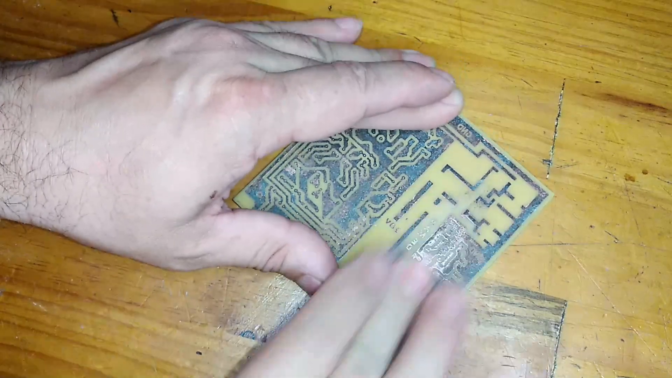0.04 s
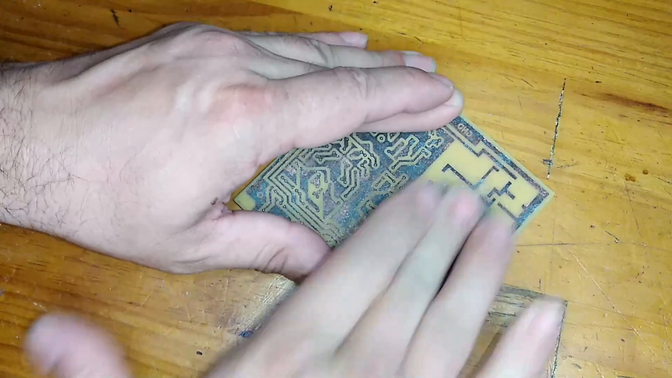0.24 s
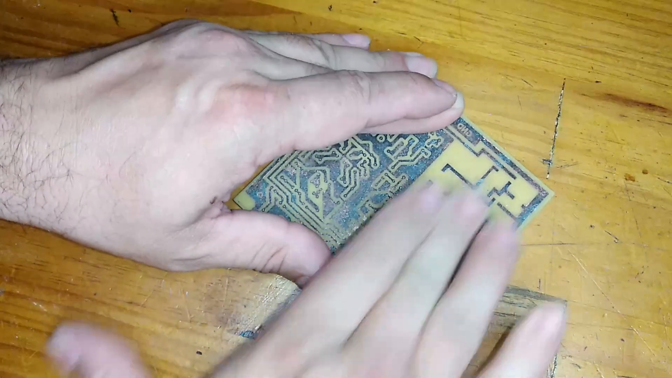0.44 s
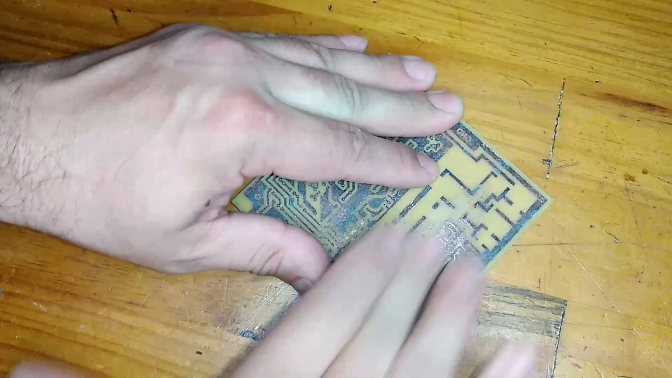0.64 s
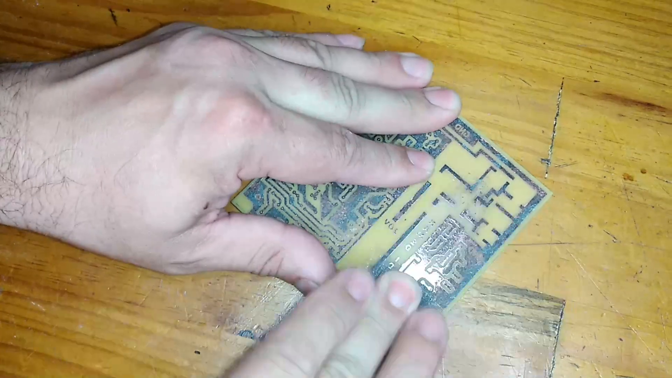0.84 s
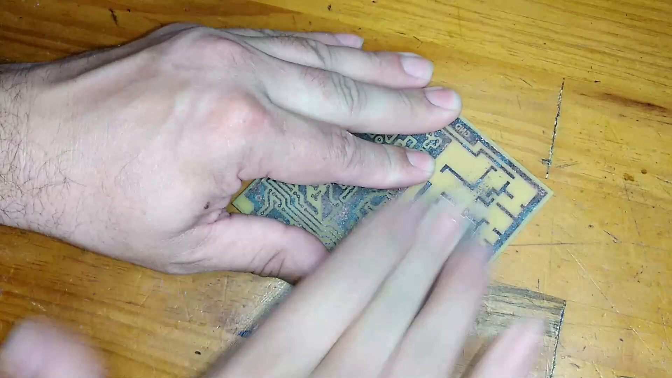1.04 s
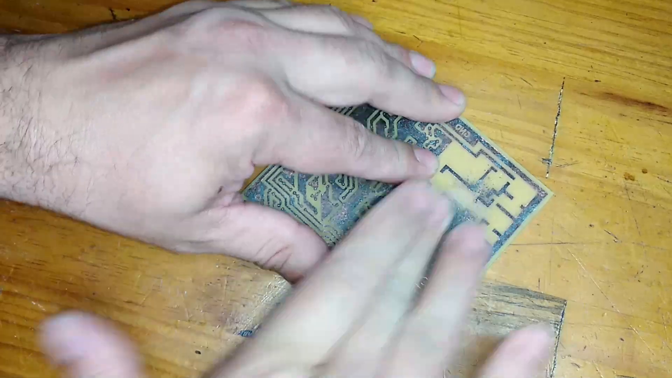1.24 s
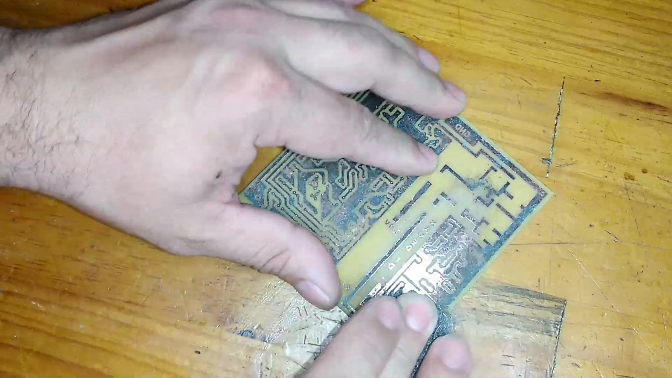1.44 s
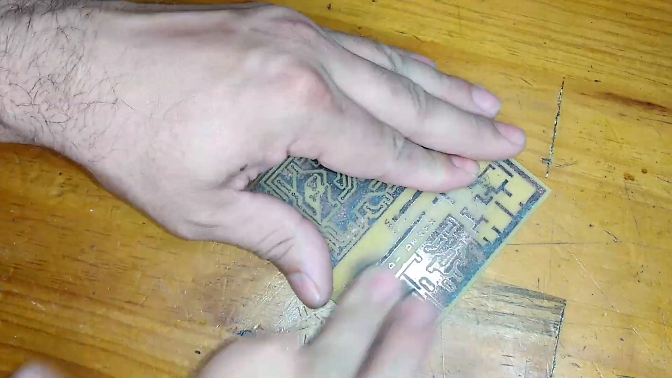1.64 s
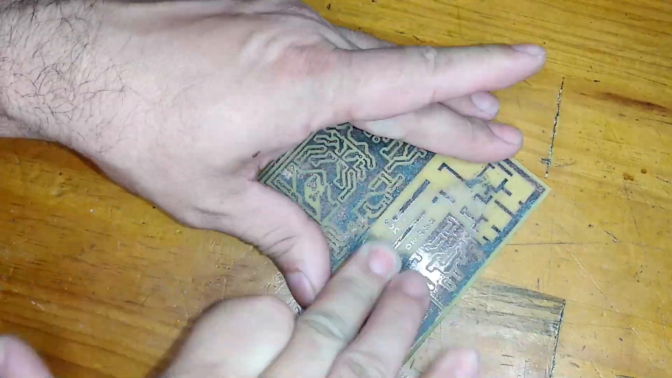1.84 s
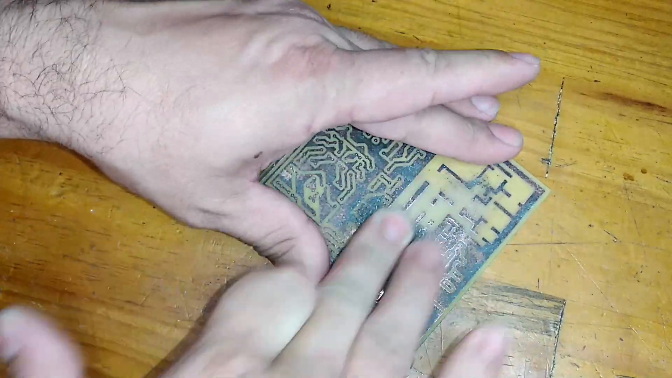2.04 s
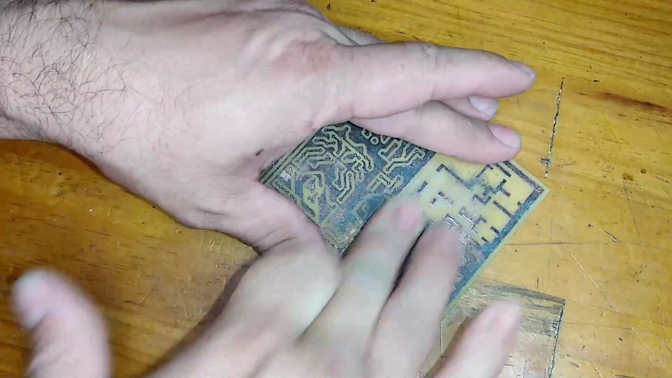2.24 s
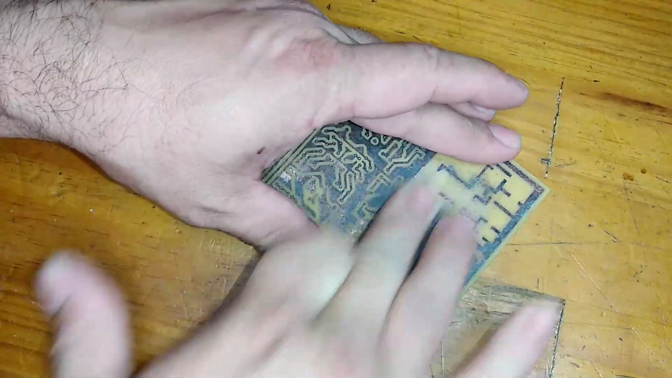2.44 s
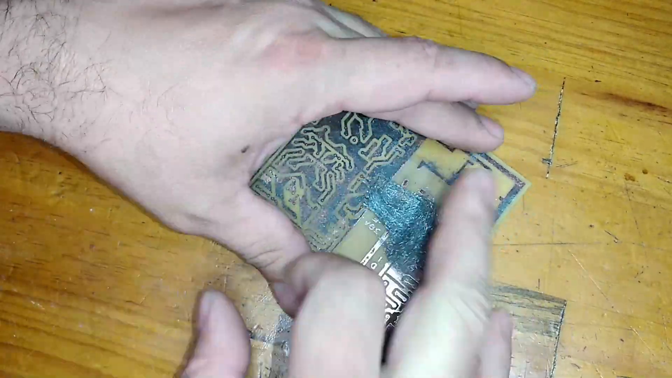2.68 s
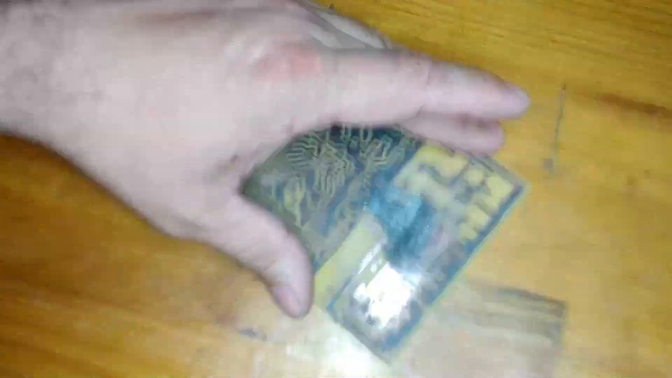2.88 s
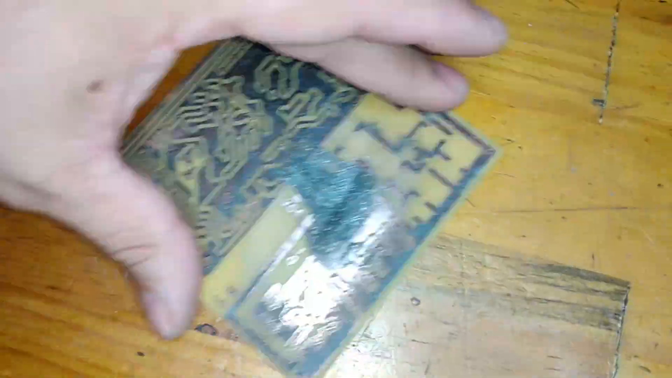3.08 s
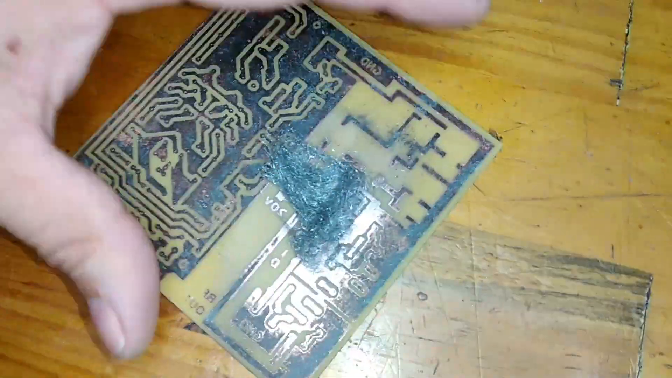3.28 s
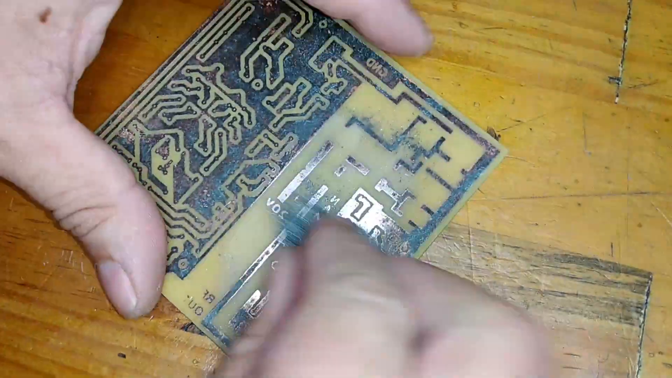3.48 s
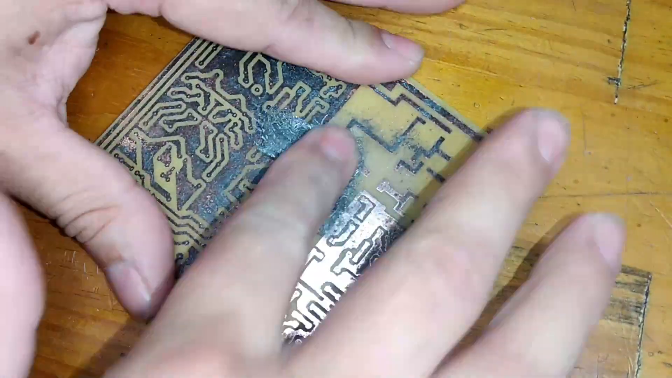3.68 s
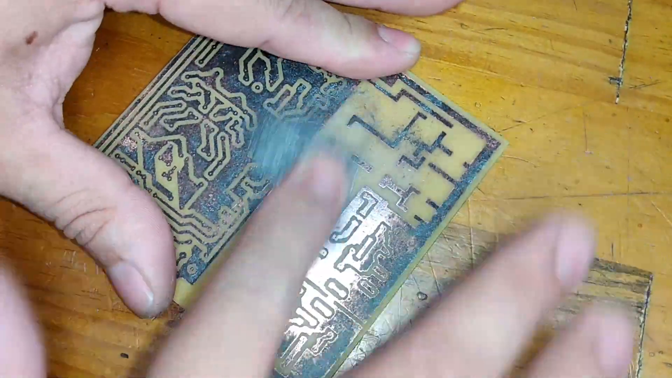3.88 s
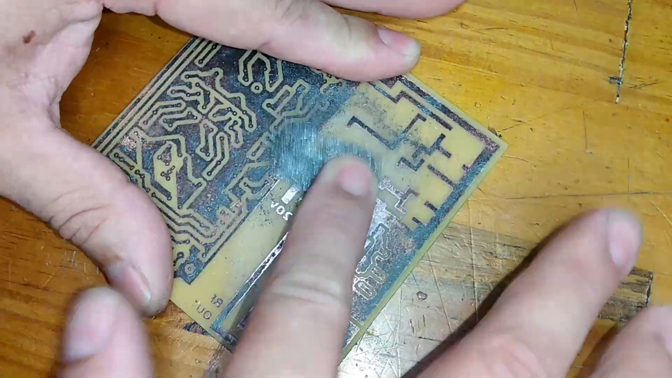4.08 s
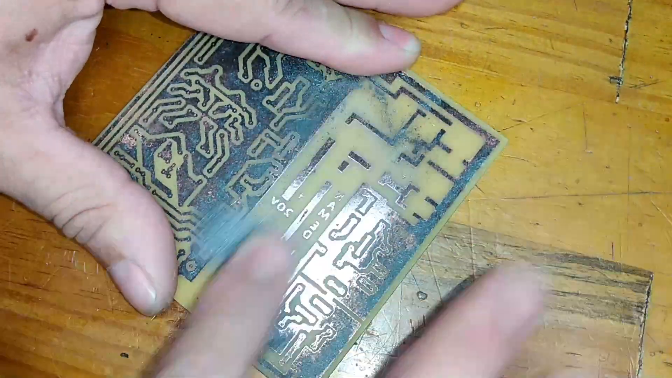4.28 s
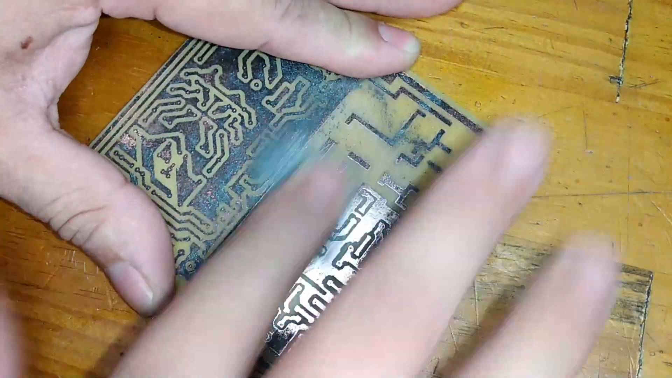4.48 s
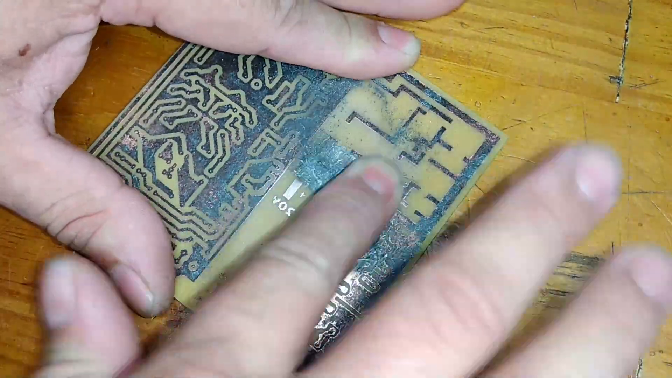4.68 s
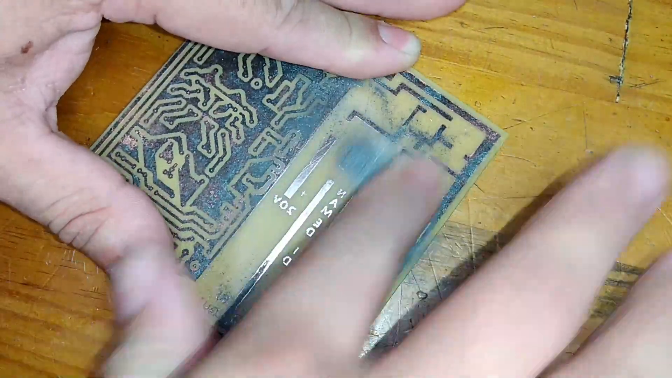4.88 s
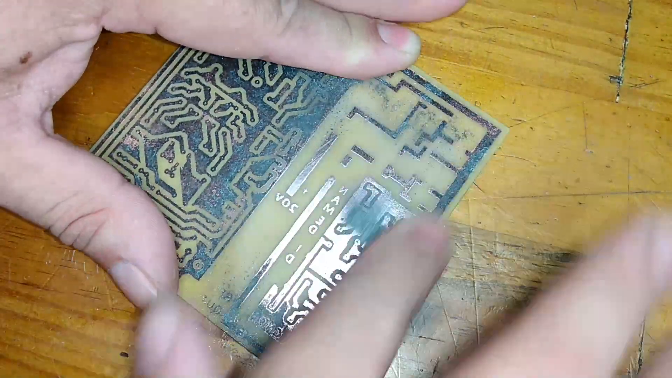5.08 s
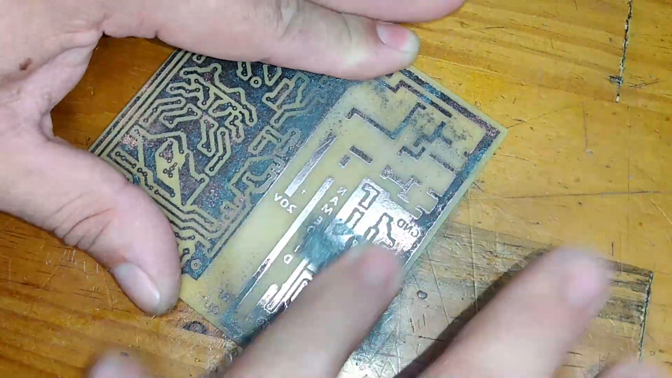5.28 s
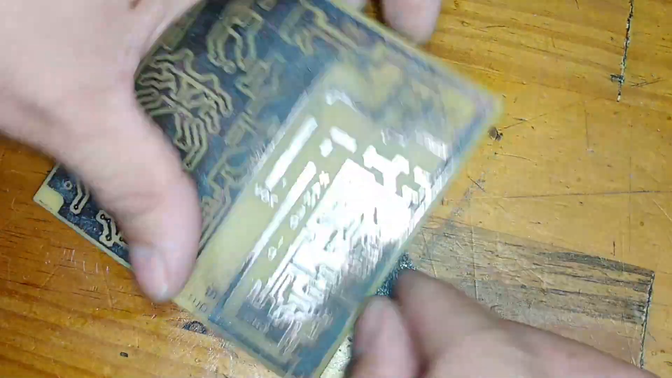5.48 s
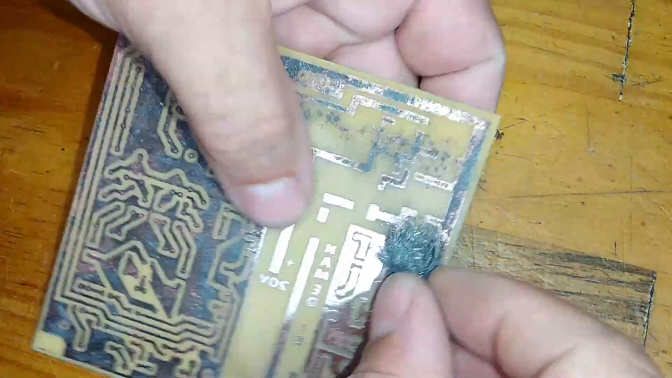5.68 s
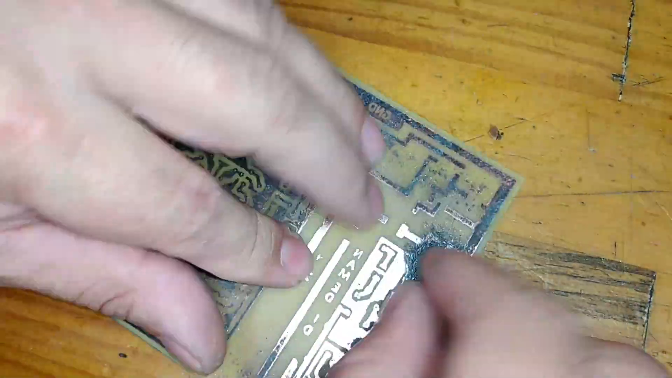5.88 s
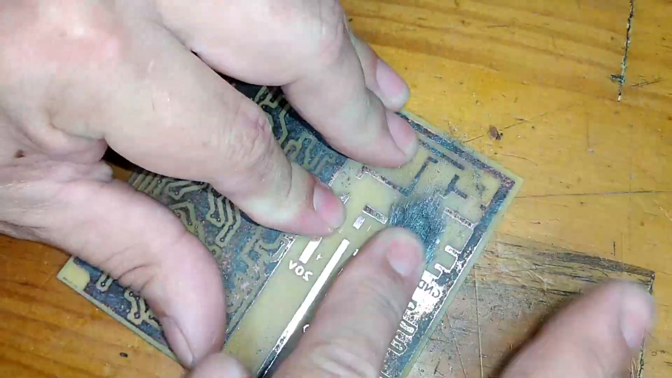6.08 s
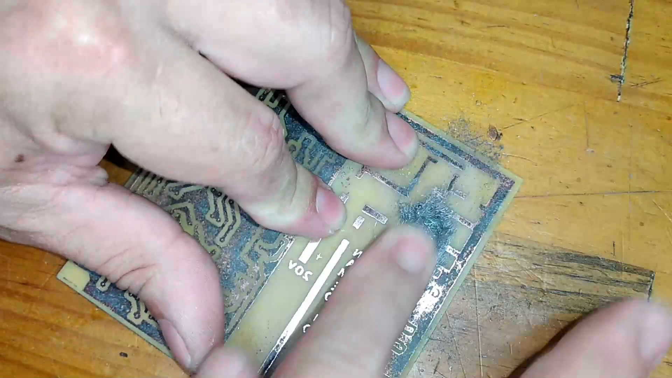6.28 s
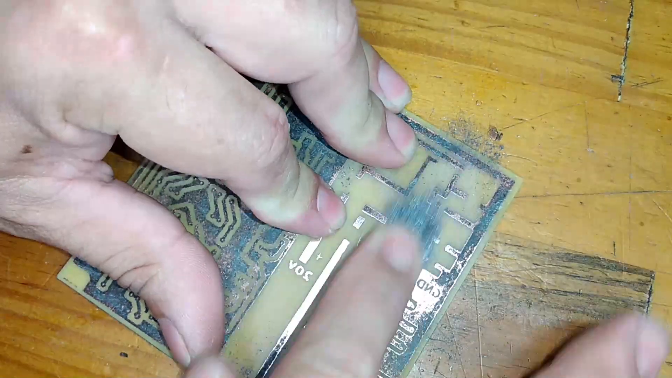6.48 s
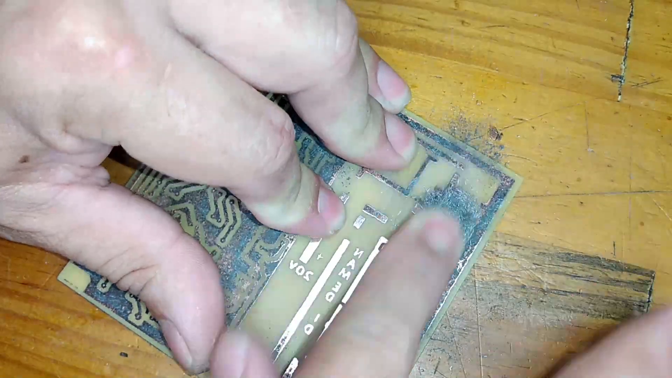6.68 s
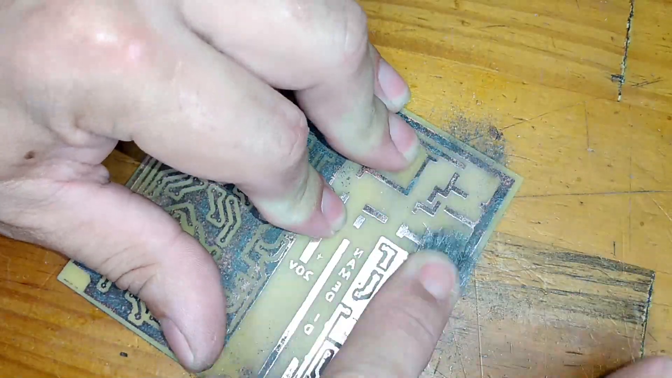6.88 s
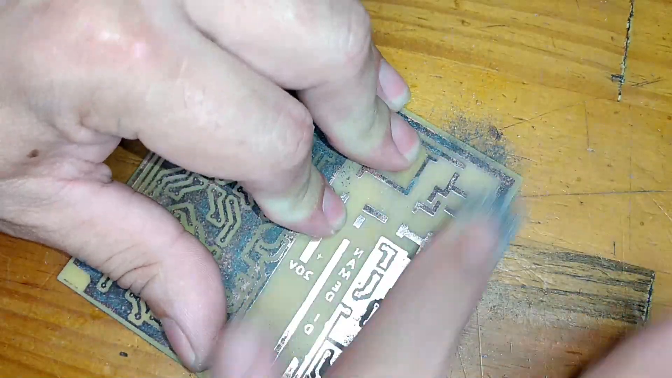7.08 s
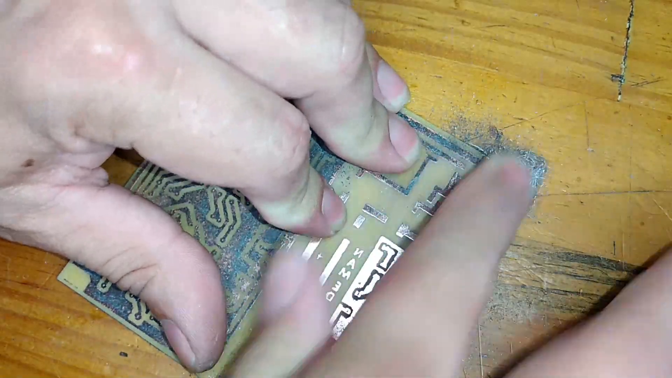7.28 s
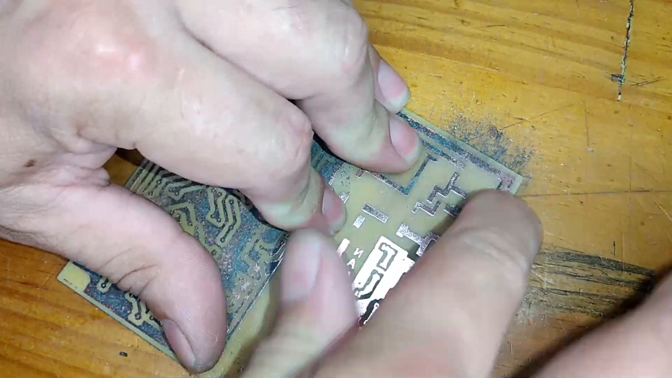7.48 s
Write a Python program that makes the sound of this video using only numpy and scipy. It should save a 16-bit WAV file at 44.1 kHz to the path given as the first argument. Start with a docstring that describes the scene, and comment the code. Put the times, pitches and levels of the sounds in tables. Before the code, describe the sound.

Hissing, raspy wire-wool strokes start slow and turn rapid, growing squeaky and hollow, broken by quiet handling ticks and one hard board clack.

```python
"""On a wooden workbench, close to the listener, a wad of steel wool is scrubbed to and fro over a circuit board.
Sliding friction is noise with random snags, swelling with each stroke's speed: it makes the wires hiss,
the board rasp and the bench rumble. Stick-slip adds squeaks and growls, and the pulls whine and sing.
Between the bouts, regripping and handling give light rubs, ticks, a slide and a clack. Small taps come with
the handling and a few strokes; thuds, a faint ringing wire, a short room tail and quiet air complete it."""
import sys
import numpy as np
from scipy import signal
from scipy.fft import rfft, irfft, next_fast_len
from scipy.io import wavfile
from scipy.ndimage import map_coordinates

SR = 44100
rng = np.random.default_rng(int(sys.argv[2]) if len(sys.argv) > 2 else 0)


def store_pcm(level_fs):
    """Save levels as 16-bit WAV."""
    pcm = np.round(np.clip(level_fs, -1, 1) * 32767).astype(np.int16)
    wavfile.write(sys.argv[1], SR, np.atleast_2d(pcm).T)


N = 332073


def amp(db):
    """Level law: decibels to amplitude gain."""
    return 10 ** (np.asarray(db) / 20)


def unit(x):
    """Normalization: scale a signal to rms 1."""
    return x / np.sqrt(np.mean(x ** 2) + 1e-20)


def along(points, hz):
    """Logarithmic frequency scale: interpolate (f/Hz, value) rows on it."""
    f, v = np.transpose(points)
    return np.interp(np.log(hz + 1), np.log(f + 1), v)


def curve(rows):
    """Linear interpolation: (t/s, value) rows as one value per sample."""
    return np.interp(np.arange(N) / SR, *np.transpose(rows))


def wobble(rate):
    """Band-limited randomness: a smooth curve through rate random knots a second."""
    knots = rng.standard_normal(int(N * rate / SR) + 4)
    return map_coordinates(knots, [np.arange(N) * rate / SR])


def filtered(x, response):
    """Linear filtering: multiply the spectrum of x by a response of frequency."""
    size = next_fast_len(N + SR // 2)
    return irfft(rfft(x, size) * response(np.fft.rfftfreq(size, 1 / SR)), size)[..., :N]


def ringing(spectrum, size=2048):
    """Minimum phase: a folded cepstrum gives a body's causal impulse response."""
    cepstrum = irfft(np.log(amp(along(spectrum, np.fft.rfftfreq(2 * size, 1 / SR))) + 1e-6))
    cepstrum[1:size] *= 2
    cepstrum[size + 1:] = 0
    return irfft(np.exp(rfft(cepstrum)))


# an even share of each round trip for push and pull; random departures from stroke to stroke
PUSH_SHARE = 0.5
UNEVEN_S, UNEVEN_HISS_DB, UNEVEN_RASP_DB = 0.00066, 1.5, 2


def strokes(bout):
    """Reciprocating motion: alternate pushes and pulls as rows (start s, length s, hiss dB, rasp dB)."""
    s, trips, *levels = np.transpose(bout)
    trips = np.round(trips)
    trip, pull = np.divmod(np.arange(2 * trips[-1] + 1), 2)
    early, hiss_luck, rasp_luck = rng.standard_normal((len(trip), 3)).T
    turns = np.interp(trip + pull * PUSH_SHARE, trips, s) + UNEVEN_S * early
    hiss_db, rasp_db, lighter_db = [np.interp(turns, s, level) for level in levels]
    hiss_db = hiss_db + UNEVEN_HISS_DB * hiss_luck
    rasp_db = rasp_db - pull * lighter_db + UNEVEN_RASP_DB * rasp_luck
    return np.column_stack([turns[:-1], np.diff(turns), hiss_db[:-1], rasp_db[:-1]])


# bouts of round trips, evenly paced between rows; levels are relative and vary by stroke:
# (t/s, round trips done [rounded], wire hiss level/dB, push rasp level/dB, pull below push level/dB)
LONG_SWEEPS = [(-0.04, 0, -31, -32.5, 15.5), (0.203, 1, -31, -34, 6), (0.72, 3, -29, -31, 8)]
FLAT_SCRUB = [(0.75, 0, -34, -35, 12), (1.191, 6, -33.5, -32, 10), (1.264, 8, -47, -62.5, 0.87),
              (1.396, 10, -35, -36.5, 9.6), (1.552, 12, -42.5, -55.5, 4.9)]
SECOND_SCRUB = [(1.704, 0, -43, -45.5, 8), (1.779, 1, -37.5, -39.5, 4.7), (1.972, 4, -35.5, -33, 11),
                (2.238, 8, -37, -34.5, 14), (2.489, 12, -38, -32.5, 9.9), (2.619, 13.5, -48, -35.5, 15)]
LOOSE_SCRUB = [(3.766, 1, -42.5, -39, 6.6), (3.834, 1, -39, -32.5, 10), (4.276, 8, -40, -25.5, 8.8),
               (4.42, 10, -38, -35, 22), (4.639, 13, -39, -29, 5.5), (5.123, 20, -38, -27.5, 19.6),
               (5.405, 24, -38, -27.5, 8.8), (5.481, 25, -61.5, -43, 12)]
TIP_SCRUB = [(6.073, 0, -51, -49.5, 1), (6.148, 1, -39, -29.5, 11.6), (6.617, 8, -42.5, -25, 18),
             (6.812, 11, -44, -29, 8.5), (7.012, 14, -41, -24.5, 10), (7.16, 16, -40, -27.5, 11),
             (7.584, 22, -43.5, -26.5, 22)]
# single light rubs as the wad is let go, shifted and picked up:
# (start t/s, length t/s, relative hiss level/dB, relative rasp level/dB)
RUBS = [(0.705, 0.057, -42, -48), (1.55, 0.053, -55, -53.5), (1.635, 0.062, -46.5, -58.5),
        (2.612, 0.043, -42, -73), (2.66, 0.11, -51.5, -70.5), (2.862, 0.042, -69.5, -86),
        (2.972, 0.057, -50, -49.5), (3.03, 0.076, -57.5, -64.5), (3.138, 0.09, -51, -61),
        (3.445, 0.068, -54, -55.5), (3.528, 0.11, -53, -62.5), (3.662, 0.079, -50, -77),
        (5.47, 0.12, -54, -57.5), (5.6, 0.14, -52.5, -72), (5.7, 0.077, -50.5, -55),
        (5.79, 0.086, -50, -76), (5.97, 0.051, -53, -70), (6.04, 0.081, -49.5, -62)]


def hand():
    """Superposition of motions: five bouts and the light rubs, then the bouts' pulls alone."""
    bouts = [strokes(bout) for bout in (LONG_SWEEPS, FLAT_SCRUB, SECOND_SCRUB, LOOSE_SCRUB, TIP_SCRUB)]
    pulls = np.vstack([bout[1::2] for bout in bouts])
    return np.vstack(bouts + [RUBS]), pulls


def stroke_force(starts, lengths, level_db, peak_at, sharpness, turn_db, settle, easing=0, dwell=0, overlap=0.2):
    """Velocity-dependent friction: power swells with speed, creeps at the turns, settles exponentially."""
    power, t = np.zeros(N), np.arange(N) / SR
    for start, length, db in zip(starts, lengths, level_db):
        near = slice(*np.searchsorted(t, [start - overlap * length, start + (1 + overlap) * length]))
        progress = (t[near] - start) / length
        half_turn = np.interp(progress, [dwell, peak_at, 1 - dwell], [0, .5, 1])
        speed = np.abs(np.sin(np.pi * half_turn))
        slowness = length / np.median(lengths)
        steepness = 2 * sharpness * slowness ** easing
        swell = speed ** steepness * np.sqrt(1 + np.pi * steepness / 2)  # mean near 1
        # the creep crossfades with that of the neighbouring strokes
        fade = np.interp(progress, [-overlap, overlap, 1 - overlap, 1 + overlap], [0, 1, 1, 0])
        creep = np.sin(np.pi / 2 * fade) ** 2
        power[near] += amp(db) ** 2 * (swell + amp(turn_db) ** 2 * creep / slowness ** 0.24)
    keep = np.exp(-1 / (settle * SR))
    return np.sqrt(signal.lfilter([1 - keep], [1, -keep], power))


def friction(snag_rate, spread_db, snag_db):
    """Sliding contact: Gaussian noise of countless contacts plus random snags (snag_rate a second)."""
    strength = amp(spread_db * np.minimum(rng.exponential(size=N), 4))
    snags = (rng.random(N) < snag_rate / SR) * strength
    return rng.standard_normal((2, N)) + amp(snag_db) * unit(snags * rng.standard_normal((2, N)))


# stereo likeness: (f/Hz, left-right correlation -1 to 1)
ALIKE = [(100, 0.94), (290, 0.99), (640, 0.43), (1300, -0.44), (3000, -0.0029)]
# stereo balance, also used by the squeaks and pull resonances: (f/Hz, left minus right level/dB)
LEFT = [(150, -1.5), (380, 2), (700, 5), (1300, -0.5), (4400, 0), (8100, 4.5)]


def heard(pair, spectrum):
    """Source-filter principle: a body colours two excitations, which mix to a set likeness; rms 1."""
    def spread(hz):
        turn = np.arccos(np.clip(along(ALIKE, hz), -1, 1)) / 2
        return amp(along(spectrum, hz)) * np.array([np.cos(turn), np.sin(turn)])

    def balance(hz):
        return amp(np.outer([.5, -.5], along(LEFT, hz)))

    mid, side = filtered(pair, spread)
    return unit(filtered(np.array([mid + side, mid - side]), balance))


def off_the_hand(x, delay_ms, sway, strength):
    """Comb filtering: a reflection off the moving hand sweeps shallow notches through the hiss."""
    n = np.arange(N)
    delay = delay_ms * SR / 1000 * np.exp(sway * wobble(8.5))
    reflection = np.array([map_coordinates(side, [n - delay]) for side in x])
    return unit(x + strength * reflection)


# grip on the wad: (t/s, 0 flat fingers - 1 loose wad - 2 fingertip)
GRIP = [(1.25, 0.31), (1.8, 0.62), (2.6, 0.73), (2.9, 1.2), (3.25, 1.39), (3.55, 1.02), (4.9, 1.15),
        (5.45, 1.58), (6.1, 1.7)]
# wire hiss spectra under flat fingers, the loosened wad and one fingertip: (f/Hz, level/dB)
HISS_FLAT = [(650, -5), (1100, -1), (1400, -2.5), (1830, -14), (1980, -5.5), (2880, -16), (3250, -8),
             (3560, -9.5), (7470, -4), (15500, -29.5)]
HISS_LOOSE = [(650, -27.5), (1100, -6), (1260, -12.5), (1660, -15), (2390, -11.5), (2580, -10),
              (4500, -9.5), (5700, -9), (6990, -4.5), (8620, -2), (15500, -19)]
HISS_TIP = [(650, -67.5), (1100, 1.5), (1260, -2.5), (1810, -9), (1960, -5), (2350, -14.5), (2600, -6),
            (2900, -13.5), (3440, -10), (4700, -10.5), (5540, -14.5), (7300, -10), (15500, -36)]


def wires(starts, lengths, hiss_db):
    """Friction noise: steel fibres hiss over copper, coloured by a crossfade of the three grips."""
    force = stroke_force(starts, lengths, hiss_db, peak_at=0.42, sharpness=0.68, turn_db=-5,
                         settle=0.0013, easing=0.1, dwell=0.06)
    contacts = friction(snag_rate=2500, spread_db=4.5, snag_db=-11.0)
    contacts = off_the_hand(contacts, delay_ms=0.51, sway=0.27, strength=0.23)
    grip = curve(GRIP)
    hiss = np.zeros((2, N))
    for k, colour in enumerate([HISS_FLAT, HISS_LOOSE, HISS_TIP]):
        hiss += np.maximum(1 - np.abs(grip - k), 0) * heard(contacts, colour)
    return hiss * force * amp(-1.93 + 0.58 * wobble(350))  # the wad bumps over the tracks


# spectrum of the finest wire tips: (f/Hz, level/dB)
FIZZ = [(5000, -30.5), (9000, -14.5), (10200, 2), (11500, -4), (15500, -0.5)]


def fizz(starts, lengths, hiss_db):
    """Speed-dependent friction: the finest wire tips add a bright top around each stroke's peak speed."""
    force = stroke_force(starts, lengths, hiss_db, peak_at=0.42, sharpness=0.99, turn_db=-16,
                         settle=0.001, dwell=0.08)
    return amp(-11.0) * force * heard(friction(snag_rate=1700, spread_db=10.0, snag_db=-8.0), FIZZ)


# board whine, higher as the wad nears its edge: (t/s, centre f/Hz, level over hiss/dB)
PULL_WHINE = [(0.098, 1300, -12), (1.4, 1400, -17), (2.1, 1504, -10.5), (4.5, 1682, -10.5),
              (5.05, 1917, -8), (6.6, 1958, -11)]
# singing of the taut wires: (t/s, centre f/Hz, level over hiss/dB)
PULL_SING = [(2.2, 7820, -19.5), (3.9, 8900, -25), (4.55, 8430, -1.5), (5.0, 8580, -9.5), (6.2, 7450, -24)]


def pull_resonance(pulls, track, width_hz, swing, wander):
    """Narrow-band resonance: noise on a carrier sounds on the pulls and bends with the hand's speed."""
    starts, lengths, hiss_db, _ = pulls.T
    s, centre_hz, over_db = np.transpose(track)
    t = np.arange(N) / SR
    speed = stroke_force(starts, lengths, np.zeros(len(starts)), peak_at=0.472, sharpness=0.83,
                         turn_db=-22, settle=0.002)
    pitch = np.interp(t, s, centre_hz) * (1 + swing * (speed - 1) + wander * wobble(14))
    phase = 2 * np.pi * np.cumsum(pitch) / SR
    a, b = filtered(rng.standard_normal((2, 2, N)), lambda hz: 1 / (1 + (2 * hz / width_hz) ** 2))
    tone = unit(a * np.cos(phase) + b * np.sin(phase))
    sides = amp(np.array([[.5], [-.5]]) * along(LEFT, centre_hz.mean()))
    level = amp(np.interp(t, starts, hiss_db) + np.interp(t, s, over_db))
    return sides * level * speed * tone


# how much of the board the steadying hand leaves free to ring: (t/s, share 0-1)
FREEDOM = [(2.7, 0), (3.0, 0.66), (3.5, 0), (3.85, 1), (5.45, 0.82), (5.6, 0), (6.11, 0), (6.16, 0.8)]
# the wad nears the board's edge: (t/s, edge scrape over board rasp level/dB)
EDGE_SCRAPE = [(4.6, -19), (5.35, -10.5), (6.2, -17.5)]
# board spectra, damped by the whole hand (also for the drags) or free around a fingertip: (f/Hz, level/dB)
BOARD_DAMPED = [(130, -16.5), (220, -7), (302, -4), (418, -2), (549, 1.5), (666, -7), (800, 0), (951, -10),
                (1400, -21), (2800, -120)]
BOARD_FREE = [(130, -19.5), (220, -8.5), (330, -3), (495, -4.5), (570, -4.5), (690, -1.5), (870, 4.5),
              (1040, -7.5), (1250, -11), (1500, -15.5), (1900, -23), (2470, -26.5), (4180, -120)]
# spectrum of the board's edge on wood, also for the slide and taps: (f/Hz, level/dB)
EDGE = [(100, -10.5), (200, -3), (350, 3.5), (650, -15), (915, 4), (1200, -12.5), (1750, 1), (2400, -5.5),
        (3340, -0.5), (5000, -1.5), (8200, -3), (15500, -20.5)]


def board(starts, lengths, rasp_db):
    """Forced vibration: drag shakes the board, pitched higher under a fingertip and bright near its edge."""
    force = stroke_force(starts, lengths, rasp_db, peak_at=0.28, sharpness=2.0, turn_db=-13.5,
                         settle=0.0064, easing=-1.5, dwell=0.048)
    contacts = friction(snag_rate=700, spread_db=1.0, snag_db=-6)
    free = curve(FREEDOM)
    body = (1 - free) * heard(contacts, BOARD_DAMPED) + free * heard(contacts, BOARD_FREE)
    scrape = amp(curve(EDGE_SCRAPE)) * heard(contacts, EDGE)
    return amp(-2.17) * force * (body + scrape)


# long, heavy pushes on which the wad drags: (start t/s, end t/s, level/dB)
DRAGS = [(-0.02, 0.034, -29.5), (0.219, 0.33, -30.5), (0.478, 0.566, -31.5)]


def drags(slip_hz=480, uneven=0.28, flutter_db=2.5, attack=0.0072, release=0.04):
    """Stick-slip: an irregular sawtooth of slips under the flat-pressed wad makes the board growl."""
    rate = slip_hz * np.exp(uneven * np.array([wobble(slip_hz), wobble(slip_hz)]))
    phase = 2 * np.pi * np.cumsum(rate, axis=1) / SR
    slips = signal.sawtooth(phase) * amp(flutter_db * wobble(slip_hz / 2))
    pressure = np.zeros(N)
    for start, end, db in DRAGS:
        pressure += amp(db) * curve([(start, 0), (start + attack, 1), (end, 1), (end + release, 0)])
    return pressure * heard(slips, BOARD_DAMPED)


# the wad catches on a push and judders: (centre t/s, level/dB, f/Hz at the centre, half length t/s)
SQUEAKS = [(1.414, -30.5, 439, .006), (1.798, -37, 434, .007), (1.867, -31, 605, .005),
           (1.925, -27.5, 504, .005), (1.988, -29.5, 689, 0.0046), (2.059, -30, 570, 0.0064),
           (2.122, -38, 472, .004), (4.037, -21, 823, 0.0072), (4.093, -25.5, 772, .005),
           (4.156, -25, 751, 0.0066), (4.3, -8, 420.3, 0.0062), (4.354, -15.5, 724, .008),
           (4.661, -14.5, 545, .0065), (4.724, -22.5, 763, 0.0051), (5.362, -21.5, 857, 0.0076),
           (6.569, -22.5, 827, 0.0055), (6.706, -17.5, 403, .0065), (6.902, -19, 530, 0.0047),
           (6.963, -15.5, 696, .0055), (7.029, -23, 668, 0.0055), (7.103, -13.5, 637, 0.0043),
           (7.175, -21.5, 705, .006), (7.252, -19, 734, 0.0062), (7.322, -21, 760, .006),
           (7.386, -22.5, 768, .006)]
JUDDER_HZ, JUDDER_DB = 608, -22.5  # a catch below this pitch is rough; above this level it also rebounds once
REBOUND_S, REBOUND_DB, REBOUND_PITCH = 0.023, -10.5, 0.89  # delay, level and pitch ratio of the rebound


def squeaks(glide=0.0254, sag=0.0349, rough=0.135, overtone_db=-29, bite=2.6, release=1.74):
    """Stick-slip: brief tones tend to sag in pitch; deep catches are rough, and loud deep ones rebound."""
    out, t = np.zeros((2, N)), np.arange(N) / SR
    flutter, stagger = amp(3.4 * wobble(230)), wobble(260)
    sides = np.array([[.5], [-.5]])
    catches = list(SQUEAKS)
    for s, db, hz, half in SQUEAKS:
        if hz < JUDDER_HZ and db > JUDDER_DB:
            catches.append((s + REBOUND_S, db + REBOUND_DB, hz * REBOUND_PITCH, half))
    for (s, db, hz, half), (bend, skew) in zip(catches, rng.standard_normal((len(catches), 2))):
        near = np.abs(t - s) < 5 * half
        u = (t[near] - s) / half
        pitch = hz * (1 + (glide * bend - sag) * u + rough * (hz < JUDDER_HZ) * stagger[near])
        phase = 2 * np.pi * np.cumsum(pitch) / SR + sides * 0.37 * skew
        swell = flutter[near] * np.exp(-.5 * np.abs(u) ** np.where(u < 0, bite, release))
        tone = np.sin(phase) + amp(overtone_db) * np.sin(2 * phase)
        out[:, near] += amp(db + sides * 1.45 * along(LEFT, hz)) * swell / swell.max() * tone
    return out


# how firmly the board lies on the bench: (t/s, relative rumble over rasp level/dB)
SEATING = [(0, -5), (0.4, 2.5), (0.65, 11.5), (1.25, 1.5), (1.45, -12), (2, -8), (2.35, 0), (2.7, 6),
           (3, -7.5), (3.3, 7.5), (3.9, -16.5), (4.3, -10.5), (4.7, -19), (5.4, -9), (6.2, -16),
           (7.5, -23.5)]
# bench top spectrum, also for the thuds: (f/Hz, level/dB)
BENCH = [(22, -34), (50, -1), (110, -7), (200, -3.5), (260, -13), (500, -37)]
# the bench top's main resonance: (f/Hz, width f/Hz, level over rumble/dB)
BENCH_MODE = (132.3, 16.4, 10.4)


def bench(starts, lengths, rasp_db):
    """Structure-borne sound: the rocking board makes the bench rumble and boom at its main resonance."""
    force = stroke_force(starts, lengths, rasp_db, peak_at=0.21, sharpness=0.97, turn_db=-8.0, settle=0.021)
    contacts = friction(snag_rate=180, spread_db=4.0, snag_db=-7.5)
    rumble = amp(curve(SEATING) - 6.5) * force * heard(contacts, BENCH)
    hz, width, db = BENCH_MODE

    def with_boom(f):
        return 1 + amp(db) * 1j * f * width / (hz * hz - f * f + 1j * f * width)

    return filtered(rumble, with_boom)


# a fingertip lands or the wad catches hard: (t/s, peak level/dB)
THUDS = [(0.314, -21), (0.572, -23), (0.761, -21), (1.587, -35), (1.655, -37.5), (1.716, -35.5),
         (3.18, -42), (3.475, -32), (3.543, -36), (4.289, -20), (4.656, -31.5), (5.069, -24.5),
         (5.508, -35), (5.883, -29), (6.698, -26)]
THUD_HZ = 450  # soft skin passes little above this


def thuds(t60=0.086):
    """Soft impact: a decaying noise push excites the bench top and is low-passed as by skin."""
    out, t = np.zeros(N + SR), np.arange(SR // 10) / SR
    top = ringing(BENCH)
    for s, db in THUDS:
        push = rng.standard_normal(len(t)) * amp(-60 * t / t60)
        thud = np.diff(signal.fftconvolve(push, top))
        thud = signal.sosfilt(signal.butter(4, THUD_HZ, fs=SR, output="sos"), thud)
        out[round(s * SR):][:len(thud)] += amp(db) * thud / np.abs(thud).max()
    return out[:N]


# the board is slid along the bench and set down: (t/s, level/dB before a random flutter)
SLIDE = [(5.45, -120), (5.53, -55.5), (5.845, -56.5), (5.868, -26), (5.88, -27), (5.89, -50), (6.02, -120)]


def slide():
    """Rough-surface friction: the board's edge grates unevenly over the wood grain."""
    grating = heard(friction(snag_rate=1900, spread_db=0.0, snag_db=-6), EDGE)
    return amp(curve(SLIDE) + 1.5 * wobble(60)) * grating


# what the board's edge rings with when touched: (f/Hz, level/dB before chance, t60/s before damping)
EDGE_MODES = [(935, 0.5, 0.11), (1550, -1, 0.08), (1813, 3, 0.038), (2260, -4.5, 0.091), (3300, -3, 0.065),
              (4580, -6.5, 0.055)]


def edge_ring(t, damping):
    """Modal superposition: decaying modes in a new balance at every touch, damped by fingers."""
    hz, db, t60 = np.transpose(EDGE_MODES)[:, :, None]
    luck, phase = rng.standard_normal((2, 2, len(hz), 1))
    modes = amp(db + 3 * luck - 60 * damping * t / t60) * np.sin(2 * np.pi * (hz * t + phase))
    ring = modes.sum(axis=1)
    return ring / np.abs(ring).max()


# small taps during the handling and a few of the strokes, and the board's clack on the bench:
# (t/s, level of the crack/dB)
TAPS = [(2.993, -30.5), (3.009, -35), (3.0314, -35.5), (3.0697, -33.5), (3.544, -36), (5.07, -28),
        (5.419, -24), (5.645, -28), (5.761, -21.5), (5.812, -26), (5.8788, -3.5), (7.172, -24)]


def taps(ring_db=-12):
    """Hard impact: short noise blows crack through the board's edge and briefly ring its modes."""
    out, t = np.zeros((2, N + SR)), np.arange(SR // 10) / SR
    edge = ringing(EDGE)
    for s, db in TAPS:
        decay = amp(-60 * t / 0.01) + amp(-33.5 - 60 * t / 0.2)
        blow = rng.standard_normal((2, len(t))) * decay
        crack = signal.fftconvolve(blow, edge[None], axes=1)[:, :len(t)]
        tap = crack / np.abs(crack).max() + amp(ring_db) * edge_ring(t, damping=2.8)
        out[:, round(s * SR):][:, :len(t)] += amp(db) * tap
    return out[:, :N]


# nails and loose wires pick at the edge: (start t/s, end t/s, typical tick level/dB)
FIDDLING = [(2.981, 3.092, -47.5), (3.528, 3.723, -58), (5.547, 5.691, -37.5)]
TICKS_PER_S = 36


def fiddling(spread_db=5, scratch_db=-9):
    """Random impulse excitation: irregular ticks ring the edge, each with a short noise scratch."""
    out, t = np.zeros((2, N + SR)), np.arange(SR // 20) / SR
    for start, end, db in FIDDLING:
        for s in rng.uniform(start, end, round((end - start) * TICKS_PER_S)):
            scratch = amp(scratch_db - 60 * t / 0.012) * rng.standard_normal((2, len(t)))
            level = amp(db + spread_db * rng.uniform(-1, 1))
            out[:, round(s * SR):][:, :len(t)] += level * (edge_ring(t, damping=2.4) + scratch)
    return out[:, :N]


PING_S = 3.228  # a wire springs free


def ping(db=-61, hz=6800, t60=0.26):
    """Free damped vibration: one released wire rings on faintly with a wavering phase."""
    t = np.maximum(np.arange(N) / SR - PING_S, 0)
    return amp(db - 60 * t / t60) * np.sin(2 * np.pi * hz * t + wobble(200)) * (t > 0)


# reverberation time: (f/Hz, t60/s)
ROOM = [(200, 0.17), (10000, 0.072)]


def room(x):
    """Diffuse reverberation: convolve with a short noise tail, different on each side."""
    hz, t, z = signal.stft(rng.standard_normal((2, SR // 3)), SR, nperseg=256)
    decay = amp(-60 * t / along(ROOM, hz)[:, None])
    tail = signal.istft(z * decay, SR, nperseg=256)[1]
    return signal.fftconvolve(x, tail / np.linalg.norm(tail[0]), axes=1)[:, :N]


# spectrum of the quiet workshop: (f/Hz, level/dB)
AIR = [(22, -19.5), (65, 0), (450, -40), (2500, -45), (7500, -41.5), (15500, -56.5)]
AIR_DB = -67.5  # rms level


def workshop_air():
    """Stationary background noise: steady Gaussian noise shaped by the workshop's spectrum."""
    return amp(AIR_DB) * heard(rng.standard_normal((2, N)), AIR)


def scene():
    """Superposition: the scrubbing and separate touches, their room tail, the bench rumble and the still air."""
    moves, pulls = hand()
    starts, lengths, hiss_db, rasp_db = moves.T
    wool = wires(starts, lengths, hiss_db) + fizz(starts, lengths, hiss_db)
    whine = pull_resonance(pulls, PULL_WHINE, width_hz=520, swing=0.08, wander=0.03)
    sing = pull_resonance(pulls, PULL_SING, width_hz=1200, swing=0.04, wander=0.041)
    rubbing = wool + whine + sing + board(starts, lengths, rasp_db) + drags() + squeaks()
    touches = thuds() + slide() + taps() + fiddling() + ping()
    work = rubbing + touches
    return work + amp(-10.0) * room(work) + bench(starts, lengths, rasp_db) + workshop_air()


TOP_HZ = 15850  # band limit


def record(dry):
    """Band limitation: an ideal low-pass removes everything from the limit upwards."""
    return filtered(dry, lambda hz: hz < TOP_HZ)


dry = scene()
out = record(dry)
store_pcm(out)
```